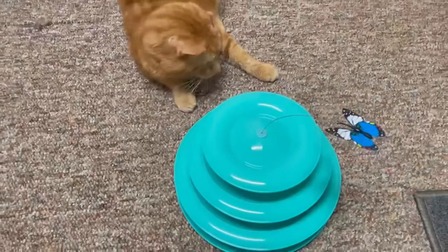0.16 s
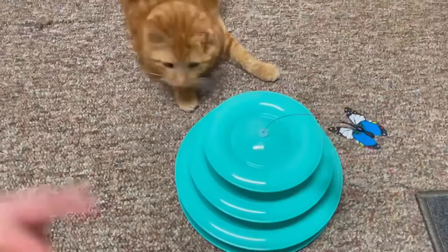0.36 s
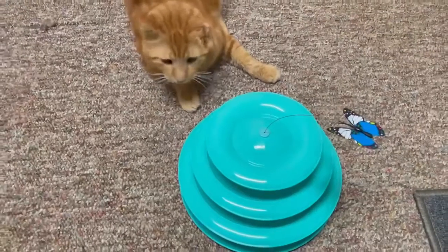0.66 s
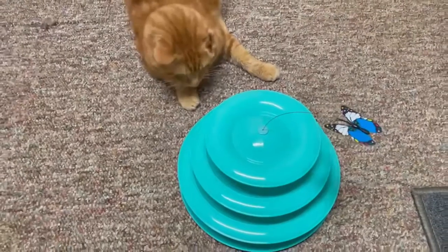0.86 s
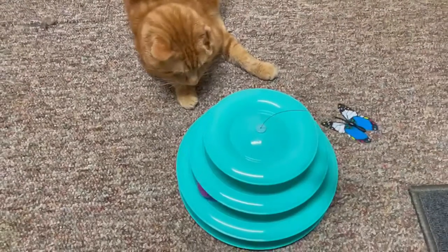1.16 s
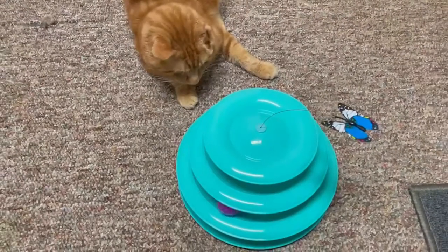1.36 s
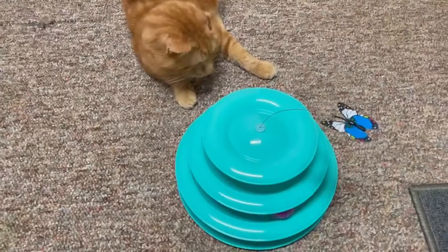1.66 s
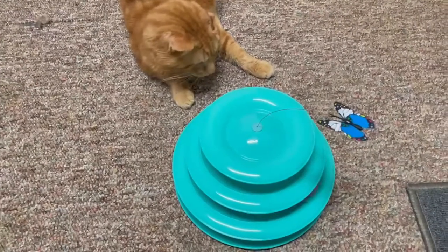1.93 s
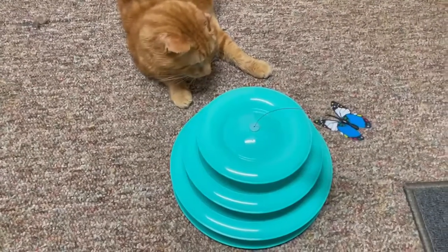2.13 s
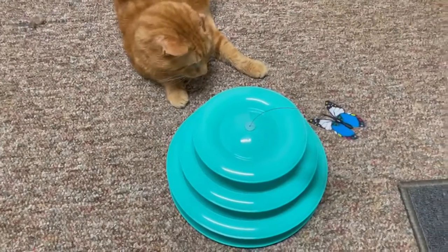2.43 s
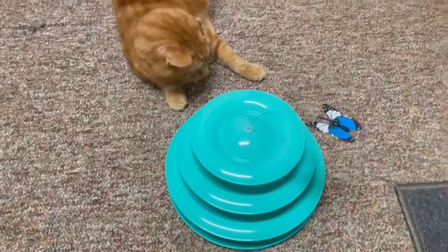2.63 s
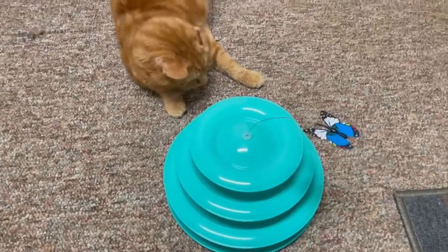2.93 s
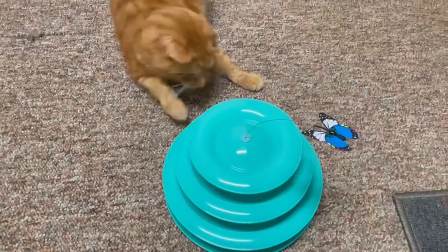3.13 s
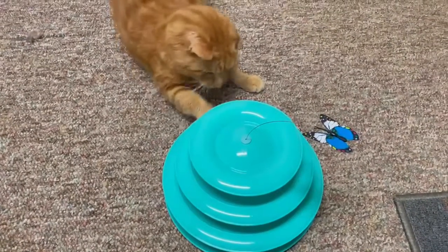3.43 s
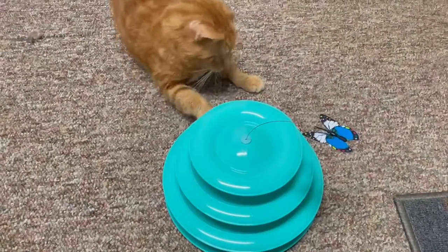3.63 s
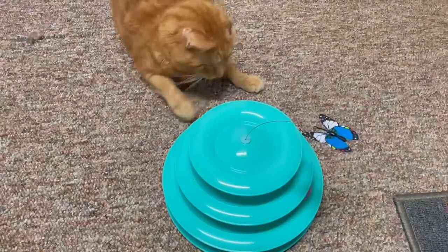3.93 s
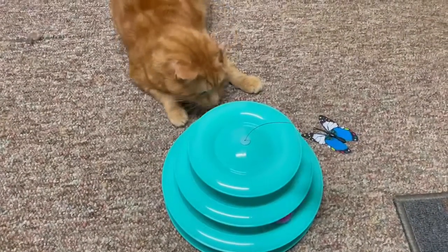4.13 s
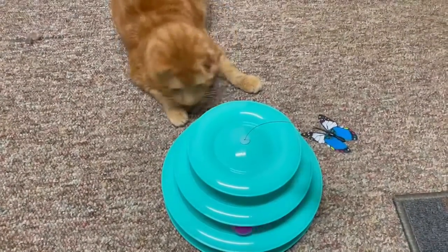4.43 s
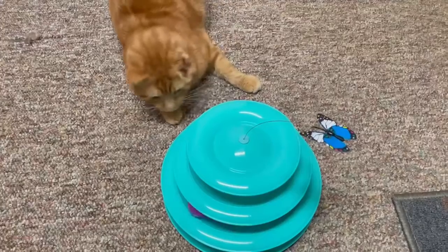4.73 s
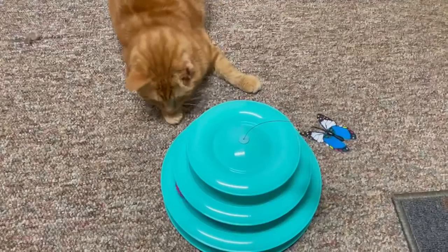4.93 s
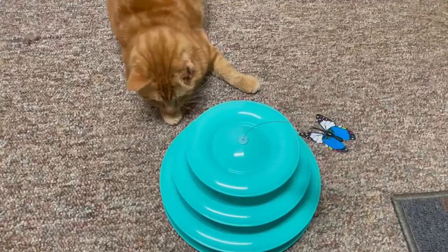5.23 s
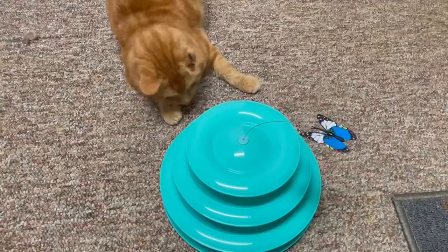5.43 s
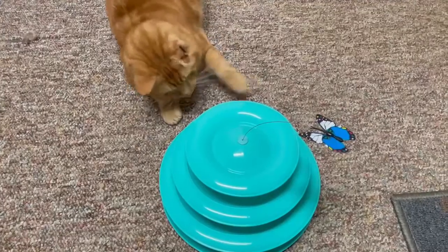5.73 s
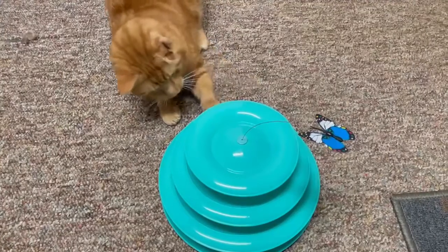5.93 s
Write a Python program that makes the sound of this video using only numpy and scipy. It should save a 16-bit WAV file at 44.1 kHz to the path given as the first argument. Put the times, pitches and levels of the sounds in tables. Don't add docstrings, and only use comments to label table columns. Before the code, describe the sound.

A hollow plastic ball rolls and knocks around a plastic track toy, gets swatted with a sharp crack, clatters round again, slows and is batted once more.

```python
import sys
import numpy as np
from scipy import signal
from scipy.fft import rfft, irfft, next_fast_len
from scipy.io import wavfile
from scipy.ndimage import uniform_filter1d

SR = 44100
rng = np.random.default_rng(int(sys.argv[2]) if len(sys.argv) > 2 else 0)


def how_loud(loudness_db):
    steps = np.asarray(loudness_db, float) / 20
    return 10 ** steps


def int16_out(signal):
    q = np.round(np.clip(np.atleast_2d(signal).T, -1, 1) * 32767)
    wavfile.write(sys.argv[1], SR, q.astype(np.int16))


N = 268128


def evened(x):
    return x / np.sqrt(np.mean(x ** 2) + 1e-20)


def peaked(x):
    return x / abs(x).max()


def steadied(x, span_s=0.079):
    power = uniform_filter1d(x ** 2, round(span_s * SR))
    return x / np.sqrt(power + 0.017 * np.mean(x ** 2))


def read(points, hz):
    f, value = np.transpose(points)
    return np.interp(np.log(hz + 1), np.log(f + 1), value)


def curve(points, s):
    return np.interp(s, *np.transpose(points))


def filtered(x, order, hz, kind):
    return signal.sosfilt(signal.butter(order, hz, kind, fs=SR, output="sos"), x)


def add(mix, s, sound):
    part = mix[:, round(s * SR):][:, :sound.shape[-1]]
    part += sound[..., :part.shape[1]]


def wander(per_s, count):
    steps = rng.standard_normal((count, 400))
    knots = np.arange(steps.shape[1])
    place = np.clip(np.arange(N) / SR * per_s, 0, knots[-1])
    return np.array([np.interp(place, knots, row) for row in steps])


def soft(taps, contact_s):
    return signal.oaconvolve(taps, np.hanning(round(contact_s * SR) + 2))[:len(taps)]


def uneven_taps(per_s, spread_db):
    size = how_loud(spread_db * np.minimum(rng.exponential(1, N), 4)) * rng.choice([-1, 1], N)
    return size * (rng.random(N) < per_s / SR)


def ring(x, modes, shares_db):
    out = 0
    for k, ((hz, width_hz, db), share_db) in enumerate(zip(modes, shares_db)):
        r = np.exp(-np.pi * width_hz / SR)
        w = 2 * np.pi * hz / SR
        driven = x * how_loud(db + share_db)
        out = out + (-1) ** k * signal.lfilter([1, 0, -1], [1, -2 * r * np.cos(w), r * r], driven)
    return out


# pitch_hz, density_db (per Hz)
SCUFF_COLOUR = [(1500, -32), (2600, -2.5), (3500, -10.5), (5900, -15), (7400, -17), (9000, -7.5),
                (10500, -15), (13600, -8), (15000, -22), (16400, -33)]


def scuffed(x):
    hz = abs(np.fft.fftfreq(2048, 1 / SR))
    log_gain = np.log(how_loud(np.maximum(read(SCUFF_COLOUR, hz), -80)))
    taps = np.fft.ifft(np.exp(log_gain - 1j * signal.hilbert(log_gain).imag)).real[:512]
    return signal.oaconvolve(x, taps)[:len(x)]


# pitch_hz, density_db (per Hz)
AIR_COLOUR = [(20, -41), (52, -6), (200, -9), (500, -11.5), (1200, -20.5), (1800, -26.5), (3000, -34.5),
              (6000, -36), (9000, -45.5), (13400, -37.5), (14800, -60)]
# pitch_hz, left_right_likeness (0 to 1)
AIR_LIKENESS = [(60, .85), (300, 0.93), (1000, 0.8), (4000, 0.12), (14000, 0.082)]


def air(level_db=-74.5):
    hz = np.fft.rfftfreq(N, 1 / SR)
    a, b = rfft(rng.standard_normal((2, N)), axis=1)
    same = np.clip(read(AIR_LIKENESS, hz), -1, 1)
    z = np.array([a, same * a + np.sqrt(1 - same ** 2) * b]) * how_loud(read(AIR_COLOUR, hz))
    return how_loud(level_db) * evened(irfft(z, N, axis=1))


# pitch_hz, level_db
ROOM_COLOUR = [(100, -10.5), (350, -17), (550, -5.5), (900, 2.5), (1400, -5), (2400, -5.5), (5000, -5),
               (14000, -15)]
# pitch_hz, t60_s
ROOM_DECAY = [(200, 0.8), (1000, 0.16), (4000, 0.3), (14000, 0.08)]


def room(x):
    taps = np.zeros((2, SR // 2))
    starts = np.arange(260, SR // 2 - 20, 20)
    at = starts + rng.integers(0, 20, (2, len(starts)))
    echoes = rng.choice([-1., 1.], at.shape) * np.minimum(at / (0.018 * SR), 1)
    np.put_along_axis(taps, at, echoes, 1)
    hz, t, z = signal.stft(taps, SR, nperseg=256)
    fall_db = read(ROOM_COLOUR, hz)[:, None] - 60 * t / read(ROOM_DECAY, hz)[:, None]
    tail = signal.istft(z * how_loud(fall_db), SR, nperseg=256)[1]
    return signal.fftconvolve(x, tail / np.linalg.norm(tail[0]), axes=1)[:, :N]


# pitch_hz, left_lead_rad
PORT_LEAD = [(0, 0), (1980, 0.1), (2930, 1.4), (3700, 0.5), (4310, 0.6), (5080, 0.7), (5860, -1.1),
             (6720, -0.9), (7490, -3.0), (9560, -3.2), (10400, -4.2), (12500, -6.1), (15800, -6.4),
             (16000, -6.4)]
# pitch_hz, left_over_right_db
PORT_LEVEL = [(60, 0.5), (330, 2.5), (770, 1.5), (1300, 3.5), (1650, 3.5), (2200, -2.5), (4200, 3.5),
              (8000, 3.1), (15000, 0.5)]


def ports(x):
    size = next_fast_len(N + 4096)
    hz = np.fft.rfftfreq(size, 1 / SR)
    half = how_loud(read(PORT_LEVEL, hz) / 2) * np.exp(.5j * curve(PORT_LEAD, hz))
    return irfft(rfft(x, size, axis=1) * np.array([half, 1 / half]), size, axis=1)[:, :N]


# time_s, groove_force_db
ROLL_FORCE = [(0, -57), (.2, -60), (.364, -59.5), (.73, -63.5), (.97, -68.5), (1.4, -69), (1.75, -68),
              (2.2, -69.5), (2.65, -69.5), (3.13, -69), (3.2, -56), (3.97, -64.5), (4.3, -66),
              (4.57, -70.5), (5.2, -79), (5.4, -87), (5.46, -79), (6.08, -83)]


def force_db(s):
    return curve(ROLL_FORCE, s) - USUAL_DB


# time_s, swell_db
FLOOR_JOLTS = [
    (.68, 7.5),
    (1.08, 9),
    (2.98, 6),
    (3.39, 7.5),
    (4.37, 7),
    (4.74, 5),
    (5.81, 8),
    (6.08, 7),
]
JOLT_S = 0.061
RUMBLE_DB, RUMBLE_SLOPE, RUMBLE_LUMPS_DB = -74.5, 0.47, 1.2


def rumble():
    t = np.arange(N) / SR
    shared, left, right = rng.standard_normal((3, N))
    low = filtered(shared + 0.4 * np.array([left, right]), 3, [42, 120], "band")
    jolts_db = sum(db * np.exp(-((t - s) / JOLT_S) ** 2) for s, db in FLOOR_JOLTS)
    lumps_db = RUMBLE_LUMPS_DB * wander(6, count=1)[0]
    return how_loud(RUMBLE_DB + RUMBLE_SLOPE * force_db(t) + jolts_db + lumps_db) * evened(low)


# start_s, length_s, level_db, pitch_hz
RIB_SONGS = [
    (3.428, 0.04, -87, 6000),
    (5.815, 0.058, -68, 5930),
    (3.38, .025, -90, 5150),
    (3.525, .02, -90, 5250),
    (3.575, .04, -96, 5500),
    (5.94, .025, -88, 5800),
]
RIB_WIDTH_HZ = 42
# start_s, level_db, pitch_hz
RUB_PUFFS = [(.275, -77, 3500), (1.065, -85.5, 2860), (1.065, -91, 5000), (1.2, -98, 3680),
             (1.28, -93, 4200), (1.28, -98, 5500), (1.28, -88, 2800), (1.39, -89, 4300), (1.57, -96, 4200),
             (1.74, -94, 3700), (1.74, -96, 5300), (3.96, -94, 4300), (4.19, -91, 3870), (4.285, -95, 4480),
             (4.47, -93, 4640), (4.51, -91, 4440), (4.56, -96, 4470), (1.28, -92, 13100),
             (1.98, -95, 13200), (4.2, -91, 13000), (4.28, -97, 13500), (4.39, -95, 13500),
             (4.7, -87, 14000), (4.84, -94, 13570), (4.99, -93, 13500), (5.13, -92.5, 13500),
             (5.55, -99, 13250), (5.68, -99, 13000)]
PUFF_S, PUFF_WIDTH = 0.043, .1


def rub(length_s, level_db, pitch_hz, width_hz=RIB_WIDTH_HZ):
    u = np.minimum(np.arange(4000) / (length_s * SR), 1)
    noise = rng.standard_normal(4000) * np.sin(np.pi * u)
    return how_loud(level_db) * evened(ring(noise, [(pitch_hz, width_hz, 0)], [0]))


# start_s, length_s, level_db, from_hz, to_hz
WALL_SLIDES = [
    (5.807, .028, -52, 1480, 3000),
    (5.83, 0.019, -55.5, 2000, 2900),
    (3.149, 0.0066, -48.5, 1500, 3400),
    (3.161, 0.0058, -39, 1300, 1900),
]
SLIDE_WIDTH_HZ = 600


def slide(length_s, level_db, from_hz, to_hz):
    u = np.minimum(np.arange(2000) / (length_s * SR), 1)
    turn = np.exp(2j * np.pi * np.cumsum(from_hz + (to_hz - from_hz) * u) / SR)
    r = np.exp(-np.pi * SLIDE_WIDTH_HZ / SR)
    grit = rng.standard_normal(len(u)) ** 3
    low = signal.lfilter([1], np.convolve([1, -r], [1, -r]), grit / turn)
    return how_loud(level_db) * np.sqrt(np.sin(np.pi * u) + 1e-9) * evened((low * turn).real)


# time_s, peak_db, lower_treble_db (relative)
EDGE_TICKS = [(0.081, -58, -20), (0.0977, -52.5, -8.5), (0.383, -61, 5.5), (0.11, -57.5, -4),
              (1.066, -62, -15), (1.395, -52.5, -13), (1.502, -60, -22), (2.2857, -62.5, -11),
              (2.3812, -64, 1), (3.273, -55, 9), (3.38, -65, -10), (3.636, -65, 1), (3.1431, -39.5, -4),
              (3.157, -33, 1.2), (3.533, -50, -9), (3.692, -49.5, -33), (3.711, -57, -4),
              (3.8787, -55, 0.5), (3.9386, -58.5, -3), (3.971, -62, -11), (4.142, -50, -15),
              (4.564, -65.5, 2), (4.615, -63, -13), (4.7316, -60.5, -10), (4.7767, -64, -17.5),
              (5.11, -57.5, -20.5), (5.188, -65, -1), (5.2653, -62, -2.5), (5.7887, -52, -1),
              (5.7979, -54, 4), (5.845, -44, -1), (5.9505, -63, -4)]
SCRAPE_S = .13


def edge_tick(peak_db, lower_db, share=0.084):
    t = np.arange(4000) / SR
    grit = rng.standard_normal(len(t)) * how_loud(1.1 * rng.standard_normal(len(t))) * 0.062
    fade = np.exp(-t / np.clip(share * SCRAPE_S, .001, .03))
    scrape = scuffed(0.83 * (t == 0) + grit * np.minimum(t / 0.0051, 1) * fade)
    top = filtered(scrape, 4, 8500, "high")
    lower = filtered(scrape, 3, [3300, 7500], "band")
    edge_modes = [(4300, 410, 0.1), (5100, 180, 1.7), (6050, 240, 0.1)]  # pitch_hz, width_hz, level_db
    lower = peaked(lower) + 0.5 * peaked(ring(lower, edge_modes, [0, 0, 0]))
    return how_loud(peak_db) * (peaked(top) + how_loud(lower_db) * peaked(lower))


# time_s, peak_db, pitch_hz
PANEL_CLATTER = [(.0065, -48, 1480), (0.0437, -47, 1464), (.083, -45.5, 710), (.1008, -45, 1700),
                 (0.0844, -50, 344), (.1125, -49, 667), (.252, -49, 1100), (.271, -48.5, 366),
                 (.292, -47, 344), (.307, -47, 1370), (.386, -42.5, 1400), (.434, -53, 1400),
                 (.446, -51, 363), (.714, -51, 370), (3.159, -39, 562.5), (3.1585, -39, 3040),
                 (3.167, -40.5, 480), (3.1665, -33.5, 2117), (3.1728, -31, 1543), (3.194, -37, 1704),
                 (3.2025, -37, 2067), (3.204, -41.5, 927), (3.206, -41.5, 320), (3.207, -36.5, 1400),
                 (3.216, -36.5, 1600), (3.225, -38.5, 1487), (3.234, -39.5, 1900), (3.275, -37.5, 2050),
                 (3.280, -41.5, 1370), (3.287, -40.5, 1410), (3.297, -38.5, 1475), (3.3115, -46, 350),
                 (3.414, -46, 349), (3.7156, -50, 732), (3.9445, -48.5, 674), (4.152, -48, 344),
                 (4.237, -45, 693), (5.8, -49.5, 3400), (5.803, -44, 726), (5.817, -46.5, 720),
                 (5.807, -42, 1447), (5.813, -46, 2100), (5.8225, -45, 2100), (5.827, -45, 2870),
                 (5.837, -50, 2400), (5.863, -55, 1464), (5.872, -49, 1550), (5.881, -51, 1765),
                 (5.8926, -51, 1614)]
CLATTER_CYCLES = 2.6


def clatter(s, peak_db, pitch_hz):
    u = np.arange(4000) / SR * pitch_hz / CLATTER_CYCLES
    swell = (u * np.exp(1 - u)) ** 2
    return s - CLATTER_CYCLES / pitch_hz, how_loud(peak_db) * np.sin(2 * np.pi * CLATTER_CYCLES * u) * swell


# pitch_hz, width_hz, level_db
BALL_MODES = [(1982, 174, 3), (2303, 89, -9.5), (2412, 48, -12.5), (2790, 150, -19.5)]
# time_s, level_db
LOOSENESS = [(0.0, -59), (0.13, -76), (1.13, -87.5), (1.3, -81), (2.2, -82), (2.54, -78.5), (2.73, -99),
             (3.01, -98), (3.17, -82), (3.32, -60), (3.62, -63.5), (3.76, -64), (3.89, -78), (4.52, -87),
             (4.93, -91), (5.59, -97.5), (6.01, -86), (6.08, -89)]


def rattle(taps_per_s=260, spread_db=3.0, shell_db=-3.0, sparks_per_s=45, sparks_db=-92):
    t = np.arange(N) / SR
    taps = soft(uneven_taps(taps_per_s, spread_db), .0003)
    shell = steadied(ring(taps, BALL_MODES, 4 * wander(25, count=len(BALL_MODES))), .15)
    hits = abs(uneven_taps(sparks_per_s, spread_db))
    bursts = signal.lfilter([1], [1, -np.exp(-1 / (.006 * SR))], hits)
    sparks = evened(scuffed(bursts * rng.standard_normal(N)))
    shell = how_loud(curve(LOOSENESS, t) + shell_db) * shell
    return shell + how_loud(sparks_db + 1.6 * force_db(t)) * sparks


AFTER_DB, AFTER_S = 5, 0.03


def pressing_db():
    t = np.arange(N) / SR
    at_s = np.sort([0] + [row[0] for row in KNOCKS])
    since_s = t - at_s[np.searchsorted(at_s, t, "right") - 1]
    return AFTER_DB * (uniform_filter1d(np.exp(-since_s / AFTER_S), size=400) - .5)


# start_s, length_s, level_db (relative)
FREE_BASE = [
    (0, 0.92, 2.5),
    (1.036, 0.043, 10),
    (1.281, 0.2, 3.5),
    (1.678, 0.23, 3),
    (2.452, 1, 0.5),
    (3.266, 0.6, 5),
    (3.871, .67, 5.5),
    (4.694, 0.061, 8.5),
    (4.851, 0.037, 5),
]
DAMPED_DB, DRUM_EDGE_S = -5, 0.018


def drum_db(t):
    lifts_db = []
    for s, length_s, db in FREE_BASE:
        inside = np.minimum(t - s, s + length_s - t) / DRUM_EDGE_S
        lifts_db.append((db - DAMPED_DB) * np.clip(inside + .5, 0, 1))
    return DAMPED_DB + np.max(lifts_db, axis=0)


# start_s, force_db, fade_db_per_s, base_db (relative), scuff_db (relative)
PUSH_SKIDS = [
    (0, -77.5, 11, 3, -10),
    (3.167, -50, 71.5, -1, -10.5),
    (5.8, -55, 151, -17, 0),
    (5.918, -64, 180, 4, -25),
]
USUAL_DB = -65
TIER_DB, SCUFF_DB, SCUFF_SLOPE, SCUFF_PRESS = 0, -90, 1.59, 0.52
BALL_DB, BALL_SLOPE = -83.5, 1.8
SKID_TIER_DB, SKID_BALL_DB, SCUFF_FADE = -11, -5.5, 1


def layers_db():
    t = np.arange(N) / SR
    press = pressing_db()
    force = force_db(t) + press
    wall_db = USUAL_DB + force
    ball_db = BALL_DB + BALL_SLOPE * force
    scuff_db = SCUFF_DB + SCUFF_SLOPE * force_db(t) + SCUFF_PRESS * press
    rolling = how_loud(np.array([wall_db, wall_db + drum_db(t), wall_db + TIER_DB, ball_db, scuff_db]))
    total = rolling
    for start_s, db, fade_db_per_s, base_db, skid_scuff_db in PUSH_SKIDS:
        fall = fade_db_per_s * np.maximum(t - start_s, 0)
        skid = db + np.array([-fall, base_db - fall, SKID_TIER_DB - fall, SKID_BALL_DB - fall,
                              skid_scuff_db - SCUFF_FADE * fall])
        total = np.hypot(total, how_loud(skid) * (t >= start_s))
    return 20 * np.log10(total), (rolling[0] / total[0]) ** 2


# pitch_hz, width_hz, level_db
BASE_MODES = [(178, 62, -19), (321.5, 30, -6), (341.9, 35.3, -0.5), (359.4, 36.2, 2), (427, 60, -4.5),
              (480, 51, -10)]
# pitch_hz, width_hz, level_db
TIER_MODES = [(671, 57.4, -2), (703, 47.7, -3), (764, 76, -7), (936, 86, -4)]
# pitch_hz, width_hz, level_db
WALL_MODES = [(983, 230, -8), (1185, 70, -5), (1141, 120, 1), (1243, 85, 3.5), (1370, 93, 7.5),
              (1460, 79, 4), (1617, 86, 2), (1780, 410, -5)]
SKID_BUMPS = 0.35


def roll(taps_per_s=900, spread_db=2.0, bumps_db=3.6, grit=0.92):
    (wall_db, base_db, tier_db, ball_db, scuff_db), rolling = layers_db()
    bumpiness = SKID_BUMPS + (1 - SKID_BUMPS) * rolling
    taps = evened(uneven_taps(taps_per_s, spread_db)) * how_loud(bumps_db * bumpiness * wander(45, count=1)[0])
    dull = soft(taps, .00035)
    hum = 0.93 * steadied(dull, 0.009) * np.std(dull)
    parts = ((BASE_MODES, base_db - 0.5, dull + hum), (TIER_MODES, tier_db, dull),
             (WALL_MODES, wall_db, dull), (BALL_MODES, ball_db, dull))
    out = 0
    for modes, db, drive in parts:
        shares_db = 3 * wander(14, count=len(modes))
        out = out + how_loud(db) * steadied(ring(drive, modes, shares_db))
    hiss = evened(uniform_filter1d(abs(taps), size=1200)) * rng.standard_normal(N)
    scuff = steadied(scuffed(grit * taps + hiss))
    return out + how_loud(2.0 + scuff_db + 2.0 * wander(18, count=1)[0]) * scuff


# time_s, peak_db, tier_ring_db (relative), ball_ring_db (relative)
FAST_KNOCKS = [(0.0433, -48, 2, 2), (0.0809, -57, 8, -22), (0.0992, -42, -1.5, -9), (0.2354, -50, -1, -14),
               (0.2623, -40.5, -3.5, -7), (0.288, -38, -16, -4), (0.3427, -49, 4, -8),
               (0.3784, -42, -10, -11), (0.3838, -44.5, -3, -13), (0.4329, -52, -15, -23),
               (0.4499, -55, 0, -26), (0.5428, -51.5, -4, -8), (0.5636, -46, -10, -18),
               (0.5771, -43, -5, -27), (0.6833, -56.5, 7.5, -23), (0.7025, -48, -0.5, -28),
               (0.7821, -54, -6, -7), (0.8031, -49, -0.5, -36), (0.8946, -48.5, -9, -27),
               (0.9423, -48, -33, -15)]
SLOW_KNOCKS = [(1.0655, -45, -12, -21), (1.077, -44.5, -9, -11), (1.2036, -50.5, -20, -12),
               (1.219, -49.5, -14, -19), (1.2872, -46.5, -13, -15), (1.3074, -44.5, -17, -9),
               (1.323, -54, -15, -22), (1.367, -50.5, -15, -11), (1.3956, -43, -9, -12),
               (1.4248, -53, -19, 0.5), (1.4917, -54, -8, -7), (1.5457, -52, -20, -27),
               (1.5789, -47, -8.5, -16), (1.6906, -46, -12, -29), (1.7518, -44.5, -20, -23),
               (1.7901, -56, -16, -10), (1.9837, -54.5, -16, -5.5), (2.0074, -54.5, -10, -19),
               (2.0766, -50, -17, -15), (2.392, -54, -18, -8), (2.484, -48, -8, -19), (2.5194, -59, 2, -6),
               (2.597, -54, 0.5, -15), (2.6353, -43, -9.5, -30), (2.6549, -47, -2, -28),
               (2.7527, -54, 3, -35), (2.9327, -59.5, 8.5, -31), (3.0106, -52.5, 2, -34),
               (3.0983, -48.5, -1.5, -26)]
RETURN_KNOCKS = [(3.273, -34, -7, -3.5), (3.333, -57, -10, 7), (3.366, -38, -3.5, -12),
                 (3.3784, -40, -2, -4), (3.4364, -49, -18, -2), (3.5343, -37, -4, -11),
                 (3.5604, -44.5, -8.5, 0), (3.6383, -42.5, 0, -3.5), (3.692, -40.5, 4.5, -15),
                 (3.7115, -39.5, 2, -6), (3.7868, -53, 9, 1), (3.8616, -39.5, -3, -11),
                 (3.8783, -35, -6.5, -2), (3.9378, -36, -1.5, -10), (4.0191, -48, -8, -22),
                 (4.0871, -44, 0, -29), (4.1425, -42.5, -1, -10), (4.1774, -48, -17, -10),
                 (4.2168, -51, 7, -4), (4.2867, -41.5, -0.5, -22), (4.2967, -38.5, -16, -8.5)]
COASTING_KNOCKS = [(4.4021, -48, 1, -7.5), (4.4763, -46, -0.5, -31), (4.5093, -43.5, -7, -8),
                   (4.5174, -43, -9.5, -9.5), (4.5575, -38.5, -7.5, -27), (4.6026, -50, -10, -30.5),
                   (4.7114, -55.5, 2, -8), (4.7346, -57.5, -4, -17), (4.779, -48, -15, -15),
                   (4.8458, -55.5, -10, -27), (4.8592, -61, -15, -18), (4.9054, -52.5, -4.5, -37.5),
                   (4.9504, -56, -9, -34.5), (4.9831, -53, -9, -28), (5.032, -53, -12, -25.5),
                   (5.0476, -59, -17, -16), (5.1542, -57, 0, -10), (5.1878, -46.5, -5, -16),
                   (5.2424, -46, -9, -10.5), (5.2649, -45, -13.5, -8), (5.548, -54, -5, -22),
                   (5.5638, -52, -7.5, -25), (5.5824, -57.5, -9, -33), (5.6148, -67.5, -5.5, -28),
                   (5.695, -51, -13, -20.5), (5.743, -60, -16, -19.5)]
KNOCKS = FAST_KNOCKS + SLOW_KNOCKS + RETURN_KNOCKS + COASTING_KNOCKS
# pitch_hz, width_hz, level_db
SNAP_MODES = [(1370, 260, 5), (2130, 590, -11)]
CHATTER_S, CHATTER_SLOPE = 0.37, 0.5


def knock(peak_db, tier_db, ball_db, t60_s, share=0.044, tick_db=-37, base_db=0, snap_db=-6.0,
          blow=0.83, rise_s=.0004):
    t = np.arange(4000) / SR
    chance = rng.standard_normal((len(t), 2))
    fade = np.exp(-t / np.clip(share * t60_s, .0015, .008))
    taps = .15 * chance[:, 0] * fade * (abs(chance[:, 1]) > 2.2)
    taps[0] = blow
    dull = filtered(taps, 6, 2600, "low")
    out = how_loud(tick_db) * peaked(scuffed(.4 * taps + 0.12 * chance[:, 1] * fade))
    shape = (1 - np.exp(-t / rise_s)) ** 2 * how_loud(-60 * t / (5.8 * t60_s + 0.029))
    for modes, db in ((BASE_MODES, base_db), (TIER_MODES, tier_db), (WALL_MODES, 0),
                      (BALL_MODES, ball_db), (SNAP_MODES, snap_db)):
        shares_db = 2.5 * rng.standard_normal(len(modes))
        out = out + how_loud(db) * peaked(ring(dull, modes, shares_db) * shape)
    return how_loud(peak_db - 2.0) * out


# time_s, peak_db, pitch_hz
DRY_TAPS = [(0.068, -51, 1330), (0.187, -58, 1250), (0.2927, -38.5, 1390), (0.5117, -56, 1220),
            (0.6634, -55, 1300), (0.7384, -52, 1600), (0.8254, -47, 1390), (0.846, -46, 1360),
            (0.9892, -59, 1340), (1.039, -58, 1390), (1.8811, -52.5, 1360), (1.921, -56, 1350),
            (2.0318, -57, 1370), (2.1385, -65, 1290), (2.3062, -58, 1390), (2.4329, -58, 1410),
            (2.5506, -55, 1630), (2.8594, -63, 1380), (2.9185, -52, 1170), (3.053, -61, 1390),
            (3.2144, -44, 1560), (3.2800, -35.5, 2055), (3.2994, -45, 1230), (3.4544, -53, 1600),
            (3.5694, -40.5, 1620), (4.0934, -39.5, 1340), (4.151, -39, 1310), (4.1879, -43.5, 1270),
            (4.374, -52, 1300), (4.7062, -57, 1270), (4.7626, -56, 1340), (4.8104, -59, 1320),
            (4.882, -53.5, 1390), (5.0162, -58, 1430), (5.1142, -62, 1256), (5.2986, -54.5, 1280),
            (5.5189, -62.5, 1255), (5.649, -69, 1347), (5.7094, -59, 1620)]
TAP_RING_S, TAP_TICK_DB, TAP_TIER_DB = 0.012, -33.5, -12.5
# time_s, peak_db, pitch_hz, ring_s, tier_ring_db (relative)
PAW_SWATS = [(3.1427, -31.5, 2160, 0.0067, -30), (3.1568, -9, 1664, 0.0031, -43),
             (3.1593, -21, 1860, 0.0028, -33), (3.1505, -42.5, 1300, 0.01, -5),
             (3.1770, -33, 1580, 0.008, -19), (3.1862, -30, 1560, .009, -15),
             (3.1990, -27, 1080, 0.003, -19), (3.2440, -36, 2350, 0.0062, -26),
             (5.789, -45, 1750, 0.011, -11), (5.8006, -33.5, 1800, 0.0072, -21),
             (5.7977, -24, 1705, 0.0038, -16), (5.8255, -39.5, 2400, .005, -34),
             (5.8425, -44, 1960, 0.005, -30), (5.8462, -42.5, 1590, .006, -30),
             (5.8749, -34, 1800, 0.0027, -30), (5.9185, -45, 1500, 0.0095, -12),
             (5.9693, -50, 1460, 0.013, -12), (6.0754, -54.5, 1970, 0.0059, -27.5)]
CRACK_TICK_DB = -23


def swat(peak_db, pitch_hz, ring_s, tick_db, tier_db, thud_db=-26.0, rib_db=-5.0):
    t = np.arange(4000) / SR
    click = 1. * (t == 0)
    rise = (1 - np.exp(-t / 0.00046)) ** 3
    crack = np.sin(2 * np.pi * pitch_hz * t) * rise * how_loud(-60 * t / max(ring_s, .003))
    crack = filtered(crack, 2, [.62 * pitch_hz, 1.5 * pitch_hz], "band")
    tick = peaked(scuffed(click + 0.39 * rng.standard_normal(len(t)) * np.exp(-t / 0.0016)))
    thin_rib = peaked(ring(click, [(6200, 150, 0)], [0]))
    tick = how_loud(tick_db) * (tick + how_loud(rib_db) * thin_rib)
    late = soft(np.roll(click, shift=110), 0.0024)
    base = peaked(ring(late, BASE_MODES, np.zeros(len(BASE_MODES))) * how_loud(-60 * t / .09))
    tier = peaked(ring(soft(click, 0.001), TIER_MODES, [2.0, 0, -5, -8]))
    return how_loud(peak_db) * (peaked(crack) + tick + how_loud(thud_db) * base + how_loud(tier_db) * tier)


def scene():
    toy = np.zeros((2, N)) + roll()
    for s, peak_db, tier_db, ball_db in KNOCKS:
        chatter_s = CHATTER_S * how_loud(CHATTER_SLOPE * force_db(s))
        add(toy, s, knock(peak_db, tier_db, ball_db, chatter_s, base_db=-12.0 + .6 * drum_db(s)))
    for s, peak_db, lower_db in EDGE_TICKS:
        add(toy, s, edge_tick(peak_db, lower_db))
    for s, length_s, level_db, pitch_hz in RIB_SONGS:
        add(toy, s, rub(length_s, level_db, pitch_hz))
    for s, level_db, pitch_hz in RUB_PUFFS:
        add(toy, s, rub(PUFF_S, level_db, pitch_hz, PUFF_WIDTH * pitch_hz))
    for s, *row in WALL_SLIDES:
        add(toy, s, slide(*row))
    for s, peak_db, pitch_hz in DRY_TAPS:
        add(toy, s, swat(peak_db - 3.5, pitch_hz, TAP_RING_S, TAP_TICK_DB, TAP_TIER_DB))
    for row in PANEL_CLATTER:
        add(toy, *clatter(*row))
    toy = toy + rattle()
    for s, peak_db, pitch_hz, ring_s, tier_db in PAW_SWATS:
        add(toy, s, swat(peak_db, pitch_hz, ring_s, CRACK_TICK_DB, tier_db))
    return ports(toy + how_loud(-10.5) * room(toy) + air() + rumble())


def band_limit(x):
    return signal.sosfilt(signal.butter(12, 16480, fs=SR, output="sos"), x)


def record(dry):
    return band_limit(dry)


dry = scene()
out = record(dry)
int16_out(out)
```